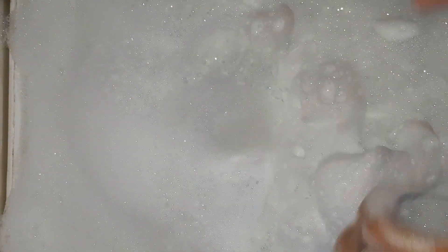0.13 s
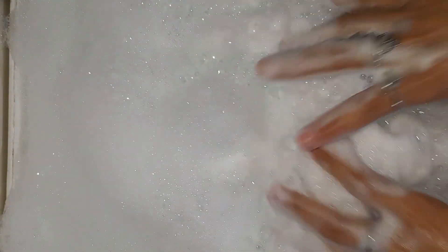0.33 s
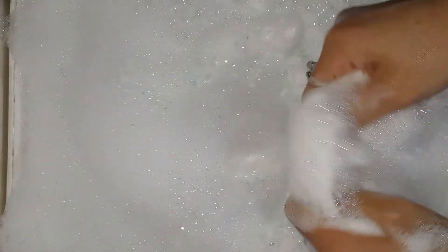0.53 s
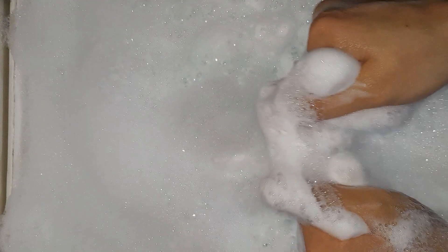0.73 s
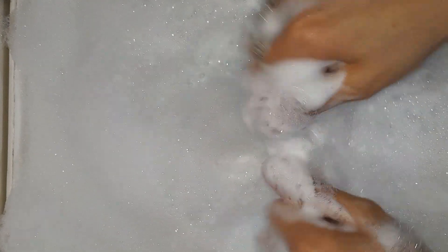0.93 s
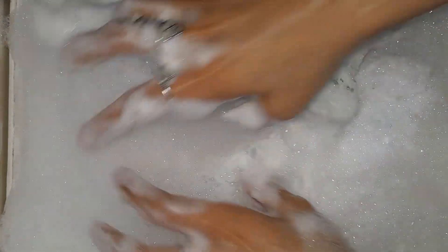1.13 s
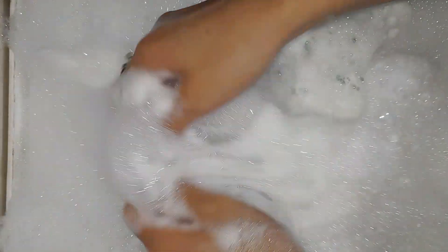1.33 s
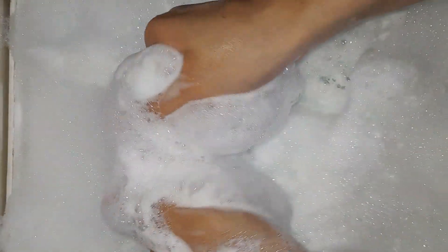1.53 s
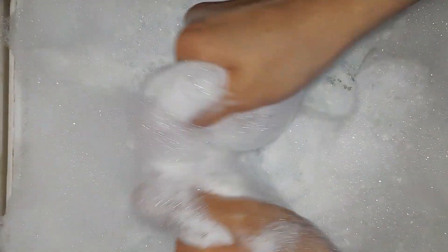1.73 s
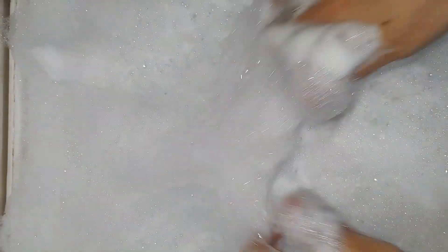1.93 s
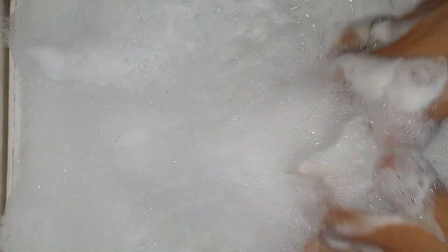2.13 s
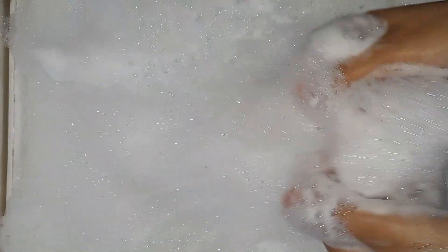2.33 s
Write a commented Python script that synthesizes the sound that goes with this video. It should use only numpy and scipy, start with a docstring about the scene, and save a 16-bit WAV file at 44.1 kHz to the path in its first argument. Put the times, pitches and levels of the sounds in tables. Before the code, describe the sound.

Close, wet squishes come from a sponge in a basin of suds: a small gulp first, then two bubbly squeezes, each followed by a watery plop. A faint distant motor hums behind them in the small room.

```python
"""Wet squelches and gulps: two hands squeeze a soapy sponge twice in a basin, in a small hard room.
Each squeeze forces out a crowd of bursting bubbles, with squirts, plops and snapping soap film;
as the grip opens, water gulps back in. A dying squelch and a small gulp open the scene.
Foam fizzes faintly throughout, and a distant motor hums as it slowly gains speed."""
import sys
import numpy as np
from scipy import signal
from scipy.fft import rfft, irfft
from scipy.io import wavfile
from scipy.ndimage import uniform_filter1d

SR = 44100
rng = np.random.default_rng(int(sys.argv[2]) if len(sys.argv) > 2 else 0)


def generate_wav(signal):
    """Clip the signal to [-1, 1] and save it as 16-bit WAV at the path in sys.argv[1]."""
    frames = np.transpose(np.atleast_2d(signal))
    scaled = np.clip(frames, -1, 1) * 32767
    pcm = np.round(scaled).astype(np.int16)
    wavfile.write(sys.argv[1], SR, pcm)


N = 105840
T, HZ = np.arange(N) / SR, np.fft.rfftfreq(N, 1 / SR)

# gulp colours: freq_hz, gain_db
SMALL_GULP = [(300, -22.5), (660, 5.5), (850, -8.5), (1100, -10.5), (2000, -14.5), (7000, -31),
              (12000, -50)]
DEEP_GULP = [(300, -16), (450, -4.5), (720, -6), (980, -9), (2500, -16), (7500, -36.5), (12000, -51)]
WIDE_GULP = [(300, -12.5), (480, -3), (1050, -2.5), (1550, -11.5), (4000, -21), (8000, -32.5), (12000, -48)]


def amp(db):
    """Decibels to gain."""
    return 10 ** (np.asarray(db) / 20)


def read(points, hz):
    """Interpolates on a log-frequency axis."""
    freq_hz, value = np.transpose(points)
    return np.interp(np.log(hz + 1), np.log(freq_hz), value)


def curve(points):
    """Interpolates over time."""
    return np.interp(T, *np.transpose(points))


def shaped(x, gain):
    """Filters by a gain per frequency."""
    return irfft(rfft(x) * gain, N)


def band(low_hz, high_hz):
    """Gain of a steep band-pass."""
    return 1 / np.sqrt((1 + (low_hz / (HZ + 1)) ** 20) * (1 + (HZ / high_hz) ** 20))


def add(mix, start_s, sound):
    """Mixes a sound in, in place."""
    part = mix[:, max(round(start_s * SR), 0):][:, :sound.shape[-1]]
    part += sound[..., :part.shape[1]]


def steadied(x, samples):
    """Holds short-term rms at one, leaving the grain."""
    power = abs(uniform_filter1d(uniform_filter1d((x ** 2).mean(0), samples), samples))
    return x / np.sqrt(power + power.max() / 10 ** 4)


def bubble(hz, cycles, rise, lag_s=0, onset_cycles=0.46):
    """A rising sine, 60 dB down after `cycles`; reaches the right channel lag_s later."""
    delays_s = np.maximum([[-lag_s], [lag_s]], 0)
    t = np.arange(int(SR * (cycles / hz + abs(lag_s)))) / SR
    turns = np.maximum(t - delays_s, 0) * hz
    age = turns / cycles
    envelope = (1 - np.exp(-turns / onset_cycles)) * np.exp(-np.log(1000) * age)
    return envelope * np.sin(2 * np.pi * turns * (1 + rise * age))


def crowd(start_s, end_s, per_s, cycles, spread_db, scatter_s):
    """Bubbles of all sizes burst at random moments and places."""
    out = np.zeros((2, N))
    span_s = end_s - start_s
    draws = np.random.default_rng(rng.integers(2 ** 30)).random((int(per_s * span_s), 5))
    for when, size, force, place, sign in draws:
        hz = 250 + 14000 * size ** 2.5
        strength = amp(spread_db * min(-np.log(1 - force), 3)) * (hz / 1000) ** .8
        ping = bubble(hz, cycles, rise=0.11, lag_s=(2 * place - 1) * scatter_s)
        add(out, start_s + when * span_s, np.sign(sign - .5) * strength * ping)
    return out


def air():
    """Low rumble, nearly common to both channels, and faint hiss."""
    # freq_hz, gain_db
    colour = [(28, -22.5), (55, 5.5), (130, 1), (250, -10.5), (600, -28), (1300, -48), (15000, -42.5)]
    left, other = rng.standard_normal((2, N))
    coherence = .95 / (1 + (HZ / 1200) ** 2)
    right = shaped(left, coherence) + shaped(other, np.sqrt(1 - coherence ** 2))
    noise = shaped(np.array([left, right]), amp(read(colour, HZ)))
    return amp(-53.5) * noise / np.sqrt(np.mean(noise ** 2))


def motor():
    """A far hum of three orders, climbing in pitch and wavering in level."""
    # time_s, turns_per_s
    speed = [(0, 45), (.2, 55.1), (.8, 57.2), (1.2, 59), (1.75, 61), (2.4, 63.8)]
    # time_s, level_db
    first_order = [(0, -70), (.8, -45), (1.1, -53), (1.72, -43), (1.83, -59.5), (1.9, -52), (2.4, -59.5)]
    second_order = [(0, -59.5), (.1, -47.5), (.31, -45.5), (.38, -68), (0.5, -43.5), (.8, -43.5),
                    (1.2, -52), (1.7, -38.5), (1.85, -44.5), (2.119, -46), (2.4, -58)]
    angle = 2 * np.pi * np.cumsum(curve(speed)) / SR
    orders_db = [curve(first_order), curve(second_order), curve(second_order) - 13.5]
    return np.sqrt(2) * sum(amp(db) * np.sin(order * angle + 2 * np.pi * rng.random())
                            for order, db in enumerate(orders_db, 1))


def room(x):
    """Diffuse tail, alike in both channels in the bass, dying sooner in the treble."""
    # freq_hz, t60_s
    decay = [(400, 0.32), (1000, 0.4), (2500, 0.37), (10000, 0.17)]
    hz, t, noise = signal.stft(rng.standard_normal((2, SR * 3 // 4)), SR, nperseg=256)
    coherence = 1 / (1 + (hz[:, None] / 620) ** 4)
    noise[1] = coherence * noise[0] + np.sqrt(1 - coherence ** 2) * noise[1]
    tail = signal.istft(noise * amp(-60 * t / read(decay, hz)[:, None]), SR, nperseg=256)[1]
    tail *= np.minimum(np.arange(tail.shape[1]) / SR / 0.0055, 1)
    return amp(-8.5) * signal.fftconvolve(x, tail / np.linalg.norm(tail[0]), axes=1)[:, :N]


def basin(x, t60_s=.09):
    """The basin rings faintly at its own pitches."""
    # pitch_hz, relative_db
    modes = [(395, -4.5), (448, 1.5), (484, 1.5), (608, -0.5), (1192, 8.5), (1825, 14.5), (2003, 2.5),
             (2223, 5), (3042, 7)]
    t = np.arange(SR // 2) / SR
    decay_per_s = np.log(1000) / t60_s
    tones = sum(amp(db) * np.cos(2 * np.pi * hz * t) for hz, db in modes)
    ring = tones * np.exp(-decay_per_s * t) * 2 * decay_per_s / SR
    return amp(-8) * signal.fftconvolve(x, ring[None], axes=1)[:, :N]


def aside(x, lag_s=0.00017):
    """Sound from one side arrives left first, coloured by the microphone's body."""
    # freq_hz, left_minus_right_db
    balance = [(250, 3.5), (650, -5.5), (1400, 1.5), (2400, 2.5), (5000, 1)]
    left_gain = np.exp(1j * np.pi * HZ * lag_s) * amp(read(balance, HZ) / 2)
    return shaped(x, np.array([left_gain, 1 / left_gain]))


def foam():
    """Tiny bubbles keep bursting in the lather, more when it is stirred."""
    # time_s, level_db
    levels = [(.18, -70), (.25, -84), (.322, -91), (.335, -72.5), (.42, -77), (.55, -68), (.6, -74.5),
              (.93, -79), (1.05, -64.5), (1.13, -78), (1.33, -74.5), (1.45, -67.5), (1.82, -77),
              (1.94, -67), (2.04, -79), (2.16, -73.5), (2.4, -81)]
    # freq_hz, gain_db
    colour = [(600, -7), (1700, -1.5), (3200, -4), (4500, -2), (8200, 3), (10000, -6.5), (15000, -6)]
    bubbles = crowd(0, N / SR, per_s=9900, cycles=5.5, spread_db=3, scatter_s=0.00024)
    fizz = shaped(bubbles, amp(read(colour, HZ)))
    return steadied(fizz, samples=3000) * amp(curve(levels))


def squirts(fade_s=0.0049, width_hz=170, climb_per_s=3.7):
    """Suds spurt between the fingers: brief, fuzzy, climbing whistles."""
    # centre_s, pitch_hz, level_db
    spurts = [(.796, 1894, -33), (.812, 1303, -37.5), (1.661, 3510, -36.5), (1.702, 4150, -40.5)]
    out = np.zeros((2, N))
    for centre_s, hz, db in spurts:
        t = T - centre_s
        flutter = shaped(rng.standard_normal(N), np.exp(-(HZ / width_hz) ** 2))
        whistle = flutter * np.sin(2 * np.pi * hz * t * (1 + climb_per_s * t / 2))
        out += amp(db) * np.exp(-(t / fade_s) ** 2) * steadied(whistle[None], samples=400)
    return out


def pops(spray_rise_s=0.0016):
    """Large air pockets plop; soap films snap with a puff of spray."""
    # start_s, pitch_hz, level_db
    pockets = [(.1225, 647, -28), (.7110, 449, -34), (.7950, 420, -41), (1.0075, 480, -26.5),
               (1.629, 436, -40), (1.677, 475, -26)]
    snaps = [(0.6237, 13000, -60), (0.773, 5200, -47), (0.8112, 4200, -30.5), (0.8557, 2030, -25),
             (0.907, 1670, -29.5), (1.006, 4800, -42), (1.6, 3500, -25), (1.62, 2960, -24.5),
             (1.643, 2270, -23.5), (1.6612, 5960, -29), (1.7031, 3000, -21)]
    out = np.zeros((2, N))
    for start_s, hz, db in pockets:
        add(out, start_s, amp(db) * bubble(hz, cycles=10, rise=0.08, onset_cycles=0.49))
    age = np.arange(SR // 50) / SR / spray_rise_s
    for start_s, hz, db in snaps:
        add(out, start_s, amp(db) * bubble(hz, cycles=7.4, rise=0.08))
        spray_band = signal.butter(3, [hz / 3, hz * 1.49], 'band', fs=SR)
        spray = signal.lfilter(*spray_band, rng.standard_normal((2, len(age))))
        add(out, start_s, amp(db - 1) * spray * age * np.exp(1 - age))
    return out


def gulps(attack_s=0.016, top_hz=1138, end_hz=378.2, sag_s=0.018):
    """Water refills the sponge: soft bubbles, and a bloop that sinks as the air pocket grows."""
    # start_s, hold_s, release_s, level_db, colour
    openings = [(0.099, 0.029, 0.0075, -50, SMALL_GULP), (0.709, 0.02, .005, -43, SMALL_GULP),
                (0.972, 0.04, .011, -37.5, DEEP_GULP), (1.863, 0.041, 0.02, -39, WIDE_GULP)]
    out = np.zeros((2, N))
    for start_s, hold_s, release_s, db, colour in openings:
        end_s = start_s + hold_s + 5 * release_s
        bubbles = crowd(start_s, end_s, per_s=14000, cycles=8.3, spread_db=2, scatter_s=.0001)
        water = steadied(shaped(bubbles, amp(read(colour, HZ)) * band(240, 16590)), samples=500)
        age_s = np.maximum(T - start_s, 0)
        fade = np.exp(-np.maximum(age_s - hold_s, 0) / release_s)
        bloop_hz = end_hz + (top_hz - end_hz) * np.exp(-age_s / sag_s)
        bloop = amp(-1) * np.sqrt(2) * np.sin(2 * np.pi * np.cumsum(bloop_hz) / SR) * fade
        out += amp(db) * np.minimum(age_s / attack_s, 1) * fade * (water + bloop)
    return out


def squeezes():
    """Air and suds forced through the pores: three bands of bubbles, each with its own level."""
    # time_s, gurgle_db, squelch_db, spray_db
    dying = [(0, -84, -54, -55.5), (.09, -75, -87, -83)]
    first = [(.665, -70, -96, -101.5), (.748, -50.5, -57, -96), (.762, -40.5, -44, -67),
             (.8, -38, -37, -52), (.835, -43, -38.5, -53), (.863, -45.5, -39, -56), (.88, -70, -51, -80.5),
             (.912, -64, -62, -79), (.972, -55, -82, -86)]
    second = [(1.53, -72.5, -95, -86), (1.584, -52, -55.5, -62.5), (1.602, -38, -46, -65),
              (1.615, -38.5, -46.5, -60), (1.655, -38.5, -37, -41.5), (1.674, -40, -38.5, -52.5),
              (1.7, -40.5, -38.5, -43), (1.745, -55.5, -49.5, -52), (1.765, -55, -81, -83)]
    # gurgle, squelch, spray: low_hz, high_hz
    bands = [(170, 900), (900, 4500), (4500, 16000)]
    # freq_hz, gain_db
    dull = [(250, -22), (390, -4.5), (620, -7.5), (960, -21.5), (1200, -9.5), (1550, -10.5), (1850, -7),
            (2230, -9), (2500, -17), (5600, -26.5), (10500, -51.5)]
    bright = [(320, -9.5), (470, 3), (960, -11), (1400, -3), (3700, -4), (5100, -21), (8400, -21),
              (11000, -41.5), (15000, -41.5)]
    out = np.zeros((2, N))
    for levels, colour, per_s in [(dying, bright, 13000), (first, dull, 16000), (second, bright, 6000)]:
        time_s, *bands_db = np.transpose(levels)
        bubbles = crowd(time_s[0], time_s[-1], per_s, cycles=6.2, spread_db=4, scatter_s=.00008)
        suds = shaped(bubbles, amp(read(colour, HZ)))
        for edges_hz, db in zip(bands, bands_db):
            envelope = amp(np.interp(T, time_s, db, -np.inf, -np.inf))
            out += envelope * steadied(shaped(suds, band(*edges_hz)), samples=600)
    return out


def scene():
    """Sponge and water in basin and room, over foam, motor and air."""
    sponge = squeezes() + gulps() + squirts() + pops()
    under_mic = (T > 1.3) & (T < 1.82)  # otherwise the sponge lies to one side
    near, far = sponge * under_mic, aside(sponge * ~under_mic)
    return near + far + basin(near + far) + room(far + amp(-0.5) * near) + foam() + motor() + air()


def record(dry):
    """Steep low-pass at 15850 Hz."""
    lowpass = signal.firwin(511, 15850, window=("kaiser", 9), fs=SR)
    return signal.oaconvolve(dry, lowpass[None], "same")


dry = scene()
out = record(dry)
generate_wav(out)
```